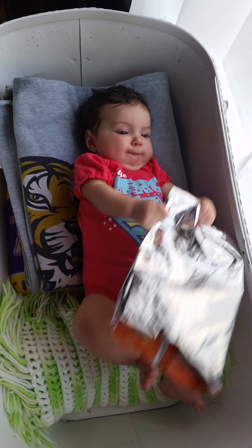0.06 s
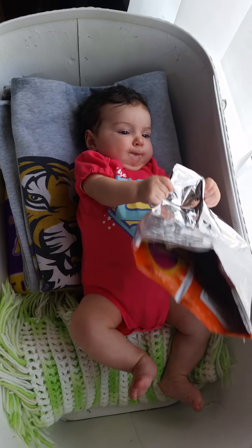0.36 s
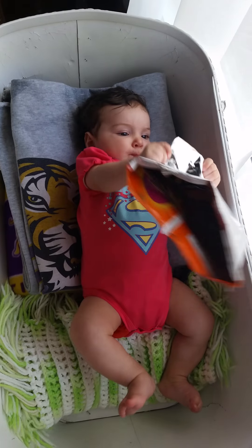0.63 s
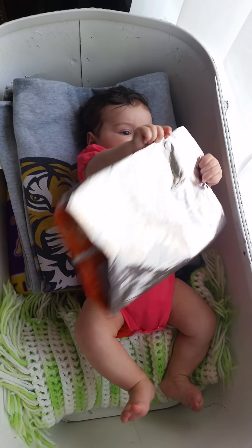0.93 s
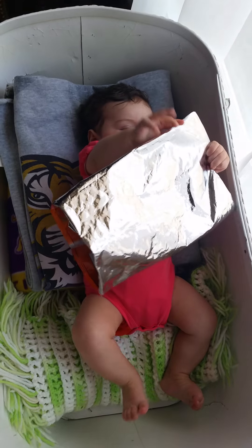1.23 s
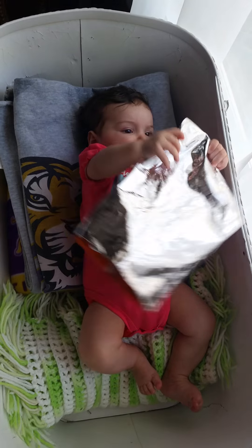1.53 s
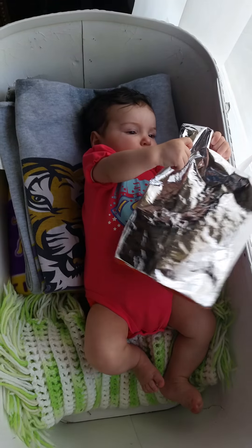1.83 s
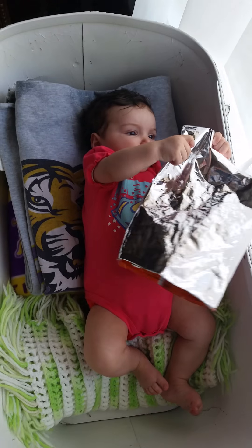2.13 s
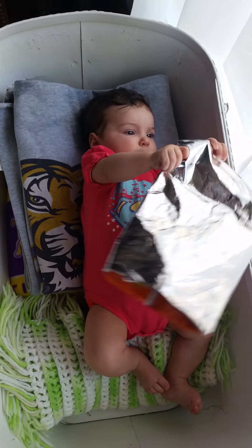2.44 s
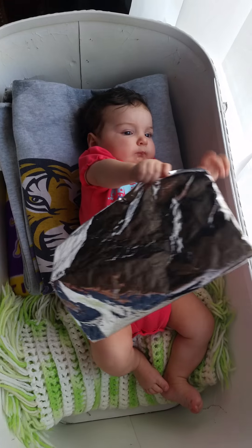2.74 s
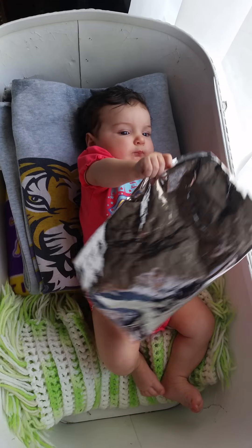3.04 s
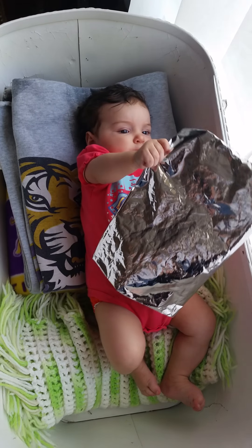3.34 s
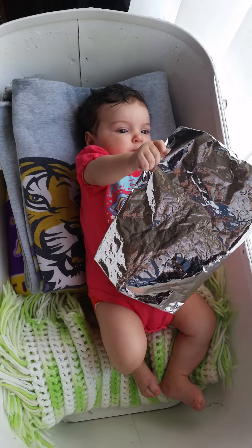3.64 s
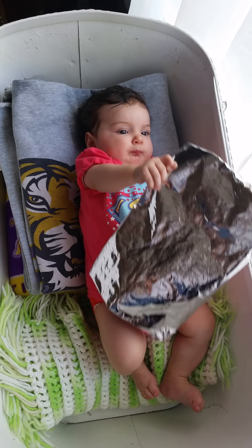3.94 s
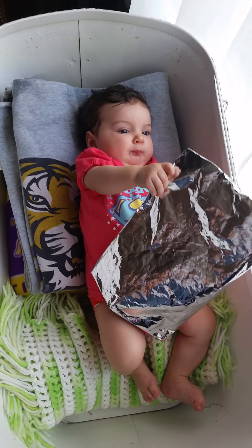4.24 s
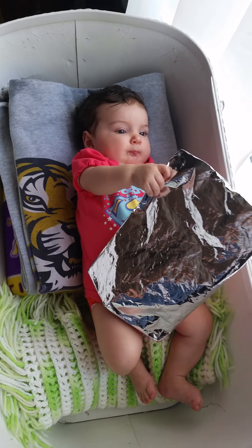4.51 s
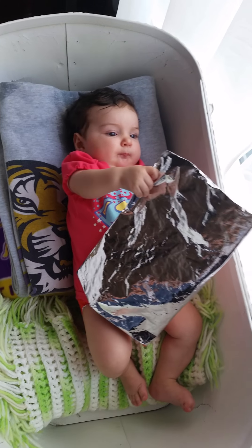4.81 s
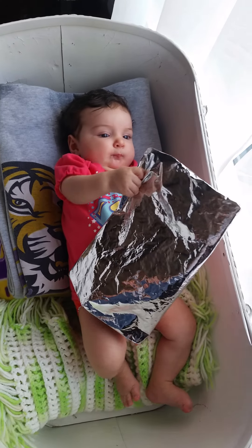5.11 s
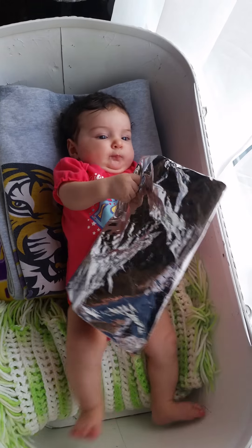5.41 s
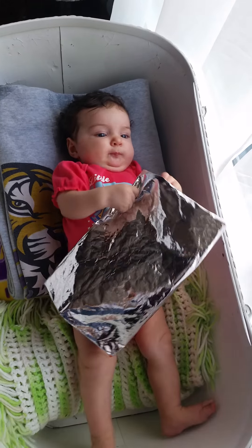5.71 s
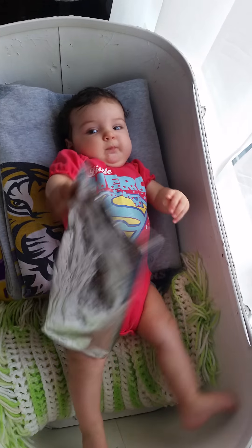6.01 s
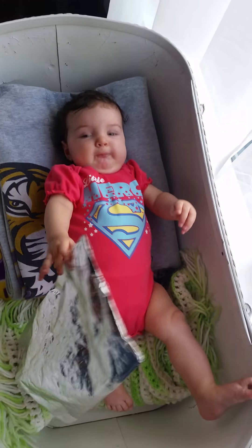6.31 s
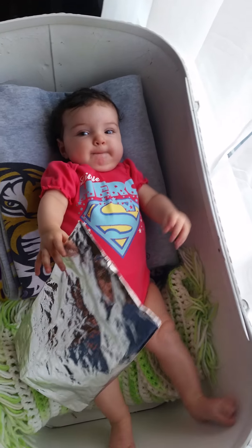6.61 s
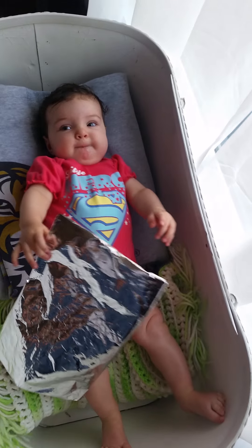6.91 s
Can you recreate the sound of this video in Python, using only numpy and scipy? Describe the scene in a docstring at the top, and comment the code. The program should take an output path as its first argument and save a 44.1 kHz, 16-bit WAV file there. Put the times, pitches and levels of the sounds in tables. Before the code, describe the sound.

In a small quiet room, a baby in a bassinet squeezes and swings a foil bag, heard close up in stereo. Crisp cracks and crinkles build through the first few seconds, then fall to a few faint ticks. Short crackles pick up again and lead to a loud flurry with soft bumps, a brushing hiss over cloth and two brief squeaks before the bag settles.

```python
"""Sharp foil snaps over a fine crinkle: a baby grabs and waves an empty bag close to a stereo microphone.
Creases buckle with a crack and set the panel beside them ringing, while small wrinkles tick.
The swinging bag bumps with dull puffs and fans a low rumble, then hisses over the baby's clothes
and drags over the blanket with two short squeaks. The bassinet walls and a small quiet room answer."""
import sys
import numpy as np
from scipy import signal
from scipy.fft import rfft, irfft, next_fast_len
from scipy.io import wavfile
from scipy.ndimage import uniform_filter1d, map_coordinates

SR = 44100
rng = np.random.default_rng(int(sys.argv[2]) if len(sys.argv) > 2 else 0)


def inscribe(sig):
    """Save sig as 16-bit PCM at rate SR to the path in sys.argv[1].

    A 1-D sig is mono; a 2-D sig holds one channel per row.
    Samples are clipped to [-1, 1] before scaling.
    """
    pcm = np.round(np.clip(np.atleast_2d(sig).T, -1, 1) * 32767)
    wavfile.write(sys.argv[1], SR, pcm.astype(np.int16))


N = 311346


# the big creases snapping through: start_s, crack_level_db, tilt_db_per_octave, panel_level_db
BIG_CREASES = [(.0119, -34.5, -6, -38.5), (.0429, -38.5, 1, -37), (.0705, -27, -1, -36.5),
               (.088, -28, 8.5, -40.5), (.107, -21.5, 2.5, -32), (.1767, -32, 4, -32),
               (.1908, -27, -7, -31), (.273, -33, -8, -39), (.2921, -30, 4, -38), (.3031, -21.5, -5.5, -47),
               (.3489, -37.5, -4, -36), (.4479, -35, -6.5, -35.5), (.551, -39, -3, -51),
               (.6969, -35.5, -3, -39.5), (.7547, -27, 0.5, -39), (.8248, -37.5, -5, -37),
               (.847, -25, 3.5, -48), (.8723, -46, -3, -34), (.9255, -42, -4.5, -36.5),
               (.9975, -31, -1, -32), (1.0303, -28.5, -2.5, -35), (1.0712, -26, 3.5, -34),
               (1.1084, -30.5, -5, -40), (1.1675, -24.5, 1, -34), (1.296, -26.5, 0.5, -34),
               (1.317, -32.5, -4, -41), (1.3912, -21.5, 0, -29), (1.4733, -24.5, 2, -41),
               (1.5306, -25.5, -3.5, -30), (1.5617, -26, -7, -37), (1.5668, -21, 0, -31),
               (1.6118, -22.5, 0.5, -29.5), (1.6336, -15, -3.5, -41), (1.6394, -12.5, 7, -19),
               (1.665, -21.5, 2, -29), (1.6741, -15.5, 8, -38), (1.6884, -22, 7, -43.5),
               (1.696, -13, 8.5, -39), (1.7041, -21, -2.5, -30), (1.7178, -21, 6, -32),
               (1.7466, -20.5, 1, -27.5), (1.7822, -21, 0.5, -29.5), (1.8309, -28.5, 7, -26.5),
               (1.8803, -34, -6, -38), (1.9598, -31, -3.5, -31), (2.0403, -43.5, -12, -47.5),
               (2.137, -29.5, -1, -40), (2.2083, -35, -6, -36.5), (2.224, -27, -3, -48),
               (2.2426, -30.5, 7, -32), (2.2665, -19, 0, -27.5), (2.2971, -23.5, 5.5, -24.5),
               (2.3241, -13, 6, -32), (2.3683, -16.5, 3, -50), (2.3825, -22.5, 2, -33),
               (2.4062, -21.5, -1.5, -32.5), (2.4405, -30.5, -4, -49), (2.5147, -33, -3, -41),
               (2.5602, -37.5, 5.5, -37), (2.6017, -34.5, -0.5, -35), (2.6291, -30.5, -1.5, -39.5),
               (2.6556, -30, -6, -33.5), (2.7567, -36, -2, -45), (2.8586, -40, -12, -44),
               (2.8668, -47, -5.5, -66), (2.907, -55, -2.5, -69.5), (3.2691, -64.5, -23, -68.5),
               (3.4491, -54.5, -13.5, -55.5), (3.4929, -75, -7.5, -55), (3.6621, -56.5, -2, -71),
               (3.6845, -52, -7.5, -73), (3.8549, -58.5, -5.5, -55.5), (3.9343, -49, 0.5, -54.5),
               (4.0561, -59.5, -2, -58.5), (4.3087, -47, -5.5, -63), (4.3277, -43, -4.5, -39.5),
               (4.3805, -35.5, 0, -41), (4.413, -44, 3.5, -43.5), (4.4629, -49.5, -8.5, -49),
               (4.581, -39, -4.5, -52.5), (4.6327, -53, -7, -52), (4.6759, -43, -7, -41),
               (4.6963, -37, -3, -36), (4.7544, -43, -3, -45), (4.8157, -48, -13, -40.5),
               (4.9573, -48, -11, -65), (4.9774, -42, -6, -41.5), (4.9834, -31.5, -4, -34),
               (5.059, -40, 0, -40.5), (5.0876, -37, -16, -36), (5.0961, -27, -2, -38.5),
               (5.2012, -49, -9, -47.5), (5.4767, -38, -7, -38.5), (5.4904, -19, 6, -28.5),
               (5.529, -28, -3.5, -34), (5.5538, -12.5, 15.5, -29), (5.57, -23, 0, -53),
               (5.5863, -14, 15, -32), (5.6161, -22, 11.5, -23.5), (5.647, -14.5, 10.5, -27.5),
               (5.6591, -27.5, -8, -32), (5.6884, -28, 6.5, -42.5), (5.7623, -31.5, -0.5, -38),
               (5.8496, -28.5, 9, -38.5), (5.8908, -26.5, -1, -37), (5.9352, -19.5, -1, -25),
               (5.9421, -22.5, -3.5, -23.5), (6.002, -34, 10, -30), (6.0165, -25, 6.5, -34),
               (6.223, -20, 4.5, -45), (6.2383, -25, -9, -28), (6.3473, -29, -5, -42),
               (6.398, -25, 18.5, -49), (6.442, -30.5, 1, -31)]
# tone of a crack before its tilt: freq_hz, gain_db
CRACK_EQ = [(60, -17), (250, -3.5), (600, -16), (1500, -13.5), (2500, 1.5), (8000, 5), (15000, -7.5)]

def snaps(creases, panel_hz=1130, panel_t60_s=.018, crack_trim_db=.5, panel_trim_db=-1.5):
    """A crease buckles with a sharp crack and kicks the foil panel beside it into a brief low ring."""
    out, t = np.zeros((2, N)), np.arange(SR // 40) / SR
    octaves_up = lambda f: np.log2(np.maximum(f / 2500, 1))  # the tilt shapes only the treble
    for start_s, crack_db, tilt, panel_db in creases:
        ring_hz = panel_hz * np.exp(.25 * rng.standard_normal())
        # the brighter the crack, the faster the fold has run along its crease
        crack_t60_s = .0095 * np.exp(.3 * rng.standard_normal() - .045 * tilt)
        attack = 1 - np.exp(-20 * t / crack_t60_s)
        burst = lambda t60_s: rng.standard_normal((2, len(t))) * attack * amp(-60 * t / t60_s)
        crack = filtered(burst(crack_t60_s), lambda f: causal(along(CRACK_EQ, f) + tilt * octaves_up(f)))
        panel = filtered(burst(panel_t60_s), lambda f: resonance(f, ring_hz, width_hz=ring_hz) ** 2)
        crack = amp(crack_db + crack_trim_db) * unit_energy(crack)
        panel = amp(panel_db + panel_trim_db) * unit_energy(panel)
        add(out, start_s, np.sqrt(SR * .001) * (crack + panel))  # levels count as energy packed into 1 ms
    return out


# each squeeze or swing of the bag: start_s, hold_s, level_db
SQUEEZES = [(0, 0.17, -65.5), (.18, 0.057, -47.5), (.36, 0.34, -67), (.69, 0.051, -55), (.84, 0.046, -47.5),
            (1.01, 0.16, -51), (1.32, 0.2, -53.5), (1.53, 0.033, -44), (1.65, 0.051, -35.5),
            (1.78, 0.071, -49), (2.0, 0.25, -69), (2.24, 0.11, -46), (2.355, 0.016, -36),
            (2.43, 0.066, -54), (2.61, .1, -52.5), (3.46, 0.085, -78), (3.96, .12, -76.5),
            (4.3, 0.092, -64.5), (4.47, 0.055, -69.5), (4.69, 0.15, -66), (5.08, 0.028, -51),
            (5.27, .18, -67.5), (5.5, .07, -51), (5.615, 0.026, -33.5), (5.92, 0.067, -39.5),
            (6.0, .24, -50.5), (6.28, 0.12, -52), (6.43, 0.354, -60), (6.82, 0.16, -77)]

def handling():
    """How hard the baby works the foil, as a gain per sample."""
    return swells(SQUEEZES, attack_s=.075, release_s=.085)


def lesser_creases(firm_grip_db=-49.5, firm_rate_per_s=36, doubling_db=16, candidates=1000):
    """Small creases give way at random: denser, louder and brighter the harder the grip."""
    moment, chance, size, colour = rng.random((candidates, 4)).T
    effort_db = 20 * np.log10(handling()[(moment * N).astype(int)]) - firm_grip_db
    rate_per_s = firm_rate_per_s * 2 ** (effort_db / doubling_db)
    gives_way = chance < rate_per_s * N / SR / candidates
    crack_db = -39 + .75 * effort_db + 4.5 * (2 * size - 1)
    tilt = -4 + .24 * effort_db + 5 * (2 * colour - 1)
    panel_db = crack_db - 4.5
    return list(np.transpose([moment * N / SR, crack_db, tilt, panel_db])[gives_way])


# bright ticking of the wrinkles: freq_hz, gain_db
WRINKLE_EQ = [(300, -35), (1500, -8.5), (2500, -2), (8000, -2), (15000, -17)]
# darker flutter of the broad panels: freq_hz, gain_db
FLUTTER_EQ = [(100, -14), (310, 1), (550, -6.5), (850, -5.5), (1800, -19), (3000, -11.5), (8000, -42)]

def crinkle(tick_gain_db, flutter_gain_db):
    """Small wrinkles tick while the foil is worked; its broad panels flutter even under gentle handling."""
    effort = handling()
    ticks = unit_rms(coloured(grains(per_s=600, spread_db=8, t60_s=.01), WRINKLE_EQ))
    flutter = unit_rms(coloured(grains(per_s=400, spread_db=5.5, t60_s=.0066), FLUTTER_EQ))
    return amp(tick_gain_db) * effort * ticks + amp(flutter_gain_db) * effort ** .66 * flutter


# soft knocks of the air-filled bag: start_s, level_db, pitch_hz
BAG_BUMPS = [(1.294, -32, 166.7), (1.315, -44, 55), (1.392, -40.5, 184.3), (1.492, -36, 182.7),
             (1.697, -41, 353.3), (2.391, -46.5, 343.6), (2.629, -43.5, 330), (2.757, -53.5, 288.4),
             (2.854, -54, 326), (4.326, -54, 380), (4.478, -55.5, 350), (4.661, -50.5, 78),
             (5.283, -49.5, 130.7), (5.588, -29, 154.4), (5.612, -32.5, 479.6), (5.635, -40.5, 163),
             (5.765, -33, 67.9), (5.913, -33, 248), (6.103, -32.5, 207), (6.175, -27.5, 180),
             (6.22, -26.5, 180), (6.429, -34.5, 171.6), (6.734, -32, 123), (6.747, -45.5, 54.7)]

def bumps(gain_db, q=2.2, rise_s=.0047, t60_s=.11, lowpass_hz=400):
    """The bag swings against a hand or leg and the heavily damped air inside gives a dull puff."""
    out, t = np.zeros((2, N)), np.arange(SR // 4) / SR
    envelope = (1 - np.exp(-t / rise_s)) * amp(-60 * t / t60_s)
    for start_s, level_db, pitch_hz in BAG_BUMPS:
        push = rng.standard_normal((2, len(t))) * envelope
        puff = filtered(push, lambda f: resonance(f, pitch_hz, pitch_hz / q) / (1 + 1j * f / lowpass_hz))
        add(out, start_s, amp(level_db + gain_db) * unit_energy(puff))
    return out


# strokes of the bag over the baby's clothes: start_s, hold_s, level_db
CLOTHES_STROKES = [(4.03, 0.054, -71.5), (5.4, 0.25, -52), (5.87, 0.074, -42.5), (6.075, 0.11, -36.5),
                   (6.205, 0.023, -32), (6.29, 0.14, -56.5), (6.53, 0.22, -49)]
# tone of foil on cloth: freq_hz, gain_db
BRUSH_EQ = [(70, -1.5), (200, 10.5), (600, -1.5), (1700, 6.5), (3500, 2), (7000, 0), (11000, 4.5),
            (15500, -6)]

def brush(patchy_db):
    """Foil on cloth hisses, and its colour shifts unevenly as other wrinkles come to touch."""
    hiss = coloured(grains(per_s=7900, spread_db=1.5, t60_s=.0062), BRUSH_EQ)
    spectra = signal.stft(hiss, nperseg=256)[2]
    patches = uniform_filter1d(rng.standard_normal(spectra.shape[1:]), size=4, axis=0)  # across frequency
    patches = uniform_filter1d(patches, size=20, axis=1)  # across time
    shifting_hiss = signal.istft(spectra * amp(patchy_db * unit_rms(patches)), nperseg=256)[1][:, :N]
    return swells(CLOTHES_STROKES, attack_s=.07, release_s=.042) * unit_rms(shifting_hiss)


# pulls of the bag's edge over the blanket: start_s, hold_s, level_db
BLANKET_DRAGS = [(5.39, 0.078, -55), (6.475, 0.052, -39)]
# resonances of the dragged edge: centre_hz, width_hz, level_db
EDGE_RESONANCES = [(945, 170, -14), (5040, 770, -8.5), (6920, 590, -2), (7760, 370, -2),
                   (11200, 2000, -7.5), (14300, 2200, -7.5)]

def drag():
    """The edge catches on so many fibres that it whistles in a few broad resonances."""
    catches = grains(per_s=8000, spread_db=3, t60_s=.003)
    edge = lambda f: sum(amp(db) / np.sqrt(width) * resonance(f, hz, width) ** 2
                         for hz, width, db in EDGE_RESONANCES)
    pull = swells(BLANKET_DRAGS, attack_s=.045, release_s=.17)  # catches quickly, slows to rest
    return pull * unit_rms(filtered(catches, edge))


# squeaks of the dragged edge: start_s, level_db, start_pitch_hz
EDGE_SQUEAKS = [(6.443, -38, 957), (6.527, -42, 1015)]

def squeaks(length_s, fall, roughness):
    """The edge sticks and slips in a short rough tone whose pitch sinks as it slows."""
    out, progress = np.zeros((2, N)), np.linspace(0, 1, int(length_s * SR))
    for start_s, level_db, start_pitch_hz in EDGE_SQUEAKS:
        jitter = roughness * wobble(knots_per_s=507)[:len(progress)]
        pitch_hz = start_pitch_hz * (1 - fall * progress + jitter)
        tone = np.sin(2 * np.pi * np.cumsum(pitch_hz) / SR)
        add(out, start_s, amp(level_db) * np.sin(np.pi * progress) * tone)
    return out


# low end of the fanned air: freq_hz, gain_db
DRAUGHT_EQ = [(20, -12.5), (42, -2), (125, 9), (300, -23.5)]

def draught(gain_db):
    """The waving bag fans a low rumble of air that swells and sinks."""
    rumble = unit_rms(coloured(rng.standard_normal((2, N)), DRAUGHT_EQ))
    drift_db = 2 * wobble(knots_per_s=5.5)
    return amp(gain_db + drift_db) * handling() ** .41 * rumble


# stereo image of the echoes and room tone, wider toward the top: freq_hz, left_right_correlation
ROOM_IMAGE = [(150, 0.97), (500, 0.37), (1500, 0.087)]

def bassinet(first_s=.0036, spread_s=.012, count=14):
    """The walls of the bassinet send back a cluster of reflections within milliseconds."""
    taps = np.zeros((2, SR // 20))
    for side in taps:
        delay_s = first_s + spread_s * rng.random(count) ** 2
        side[(delay_s * SR).astype(int)] = rng.standard_normal(count)
    return unit_energy(stereo(taps, ROOM_IMAGE))


# decay of the small room: freq_hz, t60_s
ROOM_DECAY = [(150, 0.6), (4000, 0.33), (8000, 0.16), (15000, 0.086)]

def room():
    """A diffuse tail, 5 ms late, in which the highs die first."""
    hz, t, spectra = signal.stft(rng.standard_normal((2, SR // 2)), SR, nperseg=256)
    decay = amp(-60 * t / along(ROOM_DECAY, hz)[:, None])
    tail = signal.istft(spectra * decay, SR, nperseg=256)[1]
    return np.pad(unit_energy(stereo(tail, ROOM_IMAGE)), ((0, 0), (SR // 200, 0)))


def echoes(x, new_response, hop_samples):
    """The bag keeps moving, so each stretch of its sound meets a new set of echoes."""
    out, fade = np.zeros((2, N)), signal.windows.hann(2 * hop_samples, sym=False)
    for start in range(0, N - hop_samples, hop_samples):
        part = x[:, start:start + 2 * hop_samples]
        add(out, start / SR, signal.fftconvolve(part * fade[:part.shape[1]], new_response(), axes=1))
    return out


def bedding(x, corner_hz):
    """Cloth soaks up the top of every echo."""
    return filtered(x, lambda f: 1 / (1 + 1j * f / corner_hz))


# colour of each microphone port: freq_hz, gain_db
LEFT_PORT_EQ = [(1000, 0.5), (2000, 2), (3000, 0), (5000, 6), (6200, 4.5), (7500, 8.5), (8300, -3.5),
                (9500, -4.5), (12000, -1.5), (15500, -0.5)]
RIGHT_PORT_EQ = [(1000, 0), (2000, 0.5), (3000, -4), (4200, -7.5), (6500, -8), (8000, -4.5), (9300, 6),
                 (10300, 6), (12000, 3.5), (13000, 5.5), (15500, -6)]

def microphone(x, lead_ms):
    """The sound reaches the left port first, and each port has its own colour."""
    left, right = coloured(x[0], LEFT_PORT_EQ), coloured(x[1], RIGHT_PORT_EQ)
    late_right = filtered(right, lambda f: np.exp(-2j * np.pi * f * lead_ms / 1000))
    return np.array([left, late_right])


# tone of the still room: freq_hz, density_db_per_hz
ROOM_TONE = [(20, -100), (55, -94), (120, -100), (400, -112), (1000, -121), (5000, -132)]
# narrow bands of hiss: centre_hz, width_hz, level_db
HISS_BANDS = [(3300, 400, -90), (4300, 450, -77.5), (7500, 600, -90)]

def background():
    """A bed of low room rumble, with faint steady hiss on the left."""
    air = np.sqrt(SR / 2) * stereo(coloured(rng.standard_normal((2, N)), ROOM_TONE), ROOM_IMAGE)
    hiss = sum(amp(db) * unit_rms(filtered(rng.standard_normal(N), lambda f: resonance(f, hz, width)))
               for hz, width, db in HISS_BANDS)
    return air + np.array([hiss, np.zeros(N)])


def grains(per_s, spread_db, t60_s):
    """Tiny noise bursts of uneven size at random moments, rms 1."""
    sizes = amp(spread_db * np.clip(rng.standard_normal(N), -2, 2))
    fires = rng.random(N) < per_s / SR
    power = signal.lfilter([1], [1, -amp(-120 / (t60_s * SR))], (sizes * fires) ** 2)
    return unit_rms(np.sqrt(power) * rng.standard_normal((2, N)))


def swells(moves, attack_s, release_s):
    """An envelope: each move rises 20 dB per attack_s, holds, then falls 20 dB per release_s."""
    t = np.arange(N) / SR
    drop = lambda start, hold: np.maximum(start - t, 0) / attack_s + np.maximum(t - start - hold, 0) / release_s
    return amp(np.max([db - 20 * drop(start, hold) for start, hold, db in moves], axis=0))


def wobble(knots_per_s):
    """A smooth random curve."""
    knots = rng.standard_normal(int(N * knots_per_s / SR) + 4)
    return map_coordinates(knots, [np.arange(N) * knots_per_s / SR])


def stereo(pair, image):
    """Two unrelated signals blended to the left-right correlation of an image."""
    angle = lambda hz: np.arccos(np.clip(along(image, hz), -1, 1)) / 2
    mid, side = filtered(pair, lambda hz: np.array([np.cos(angle(hz)), np.sin(angle(hz))]))
    return np.array([mid + side, mid - side])


def filtered(x, response):
    """x through a complex frequency response."""
    n = x.shape[-1]
    padded = 2 * next_fast_len(n)
    return irfft(rfft(x, padded) * response(np.fft.rfftfreq(padded, 1 / SR)), padded)[..., :n]


def causal(db):
    """The minimum-phase response with these gains."""
    cepstrum = irfft(np.log(amp(db)))
    half = len(cepstrum) // 2
    return np.exp(rfft(cepstrum * np.r_[1, np.full(half - 1, 2), 1, np.zeros(half - 1)]))


def coloured(x, eq):
    """x through a causal filter of (freq_hz, gain_db) points."""
    return filtered(x, lambda hz: causal(along(eq, hz)))


def along(points, hz):
    """Interpolate (freq_hz, value) points on a log frequency axis."""
    freqs, values = np.transpose(points)
    return np.interp(np.log(hz + 1), np.log(freqs + 1), values)


def resonance(f, centre_hz, width_hz):
    return 1j * f * width_hz / (centre_hz ** 2 - f ** 2 + 1j * f * width_hz)


def add(track, start_s, sound):
    start = int(np.clip(round(start_s * SR), 0, N - 1))
    track[:, start:start + sound.shape[-1]] += sound[..., :N - start]


def amp(db):
    return 10 ** (np.asarray(db) / 20)


def unit_rms(x):
    return x / np.sqrt(np.mean(x ** 2) + 1e-20)


def unit_energy(x):
    return x / np.sqrt(np.sum(x ** 2, axis=-1, keepdims=True) + 1e-20)


# stereo image of the bag, centred lows and wide highs: freq_hz, left_right_correlation
BAG_IMAGE = [(150, 0.93), (500, 0.93), (1200, .72), (6000, 0.23)]

def scene():
    """The bag up close, its echoes softened by bedding, and the quiet room underneath."""
    bag = snaps(BIG_CREASES + lesser_creases()) + crinkle(tick_gain_db=-3, flutter_gain_db=-22.5)
    bag += draught(gain_db=-42) + bumps(gain_db=22.5)
    bag += brush(patchy_db=2.6) + drag()
    bag = stereo(bag, BAG_IMAGE) + squeaks(length_s=.027, fall=.178, roughness=.079)
    walls = amp(-6) * echoes(bag, bassinet, hop_samples=1500)
    tail = amp(-12) * echoes(bag, room, hop_samples=7000)
    heard = bag + bedding(walls + tail, corner_hz=11123)
    return microphone(heard, lead_ms=.074) + background()


def record(dry):
    """A steep low-pass cuts the very top."""
    cutoff_hz = 15950
    return filtered(dry, lambda hz: 1 / (1 + (hz / cutoff_hz) ** 160))


dry = scene()
out = record(dry)
inscribe(out)
```